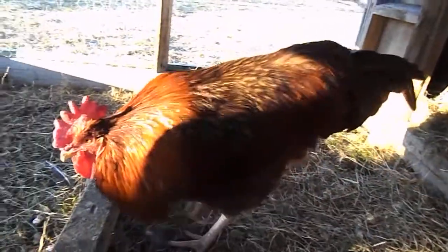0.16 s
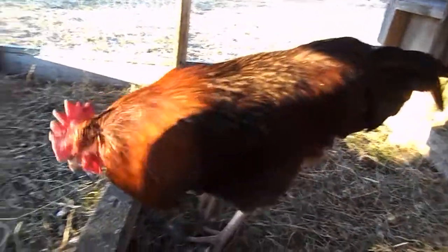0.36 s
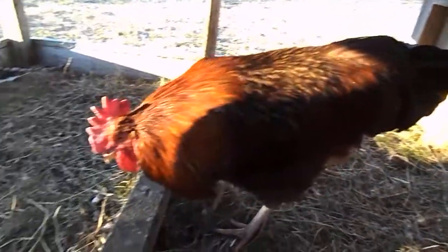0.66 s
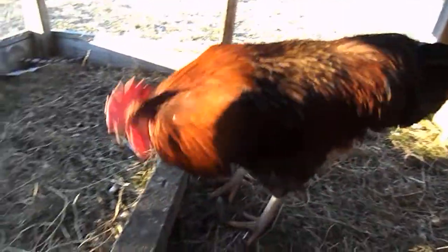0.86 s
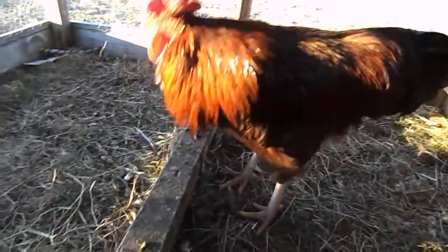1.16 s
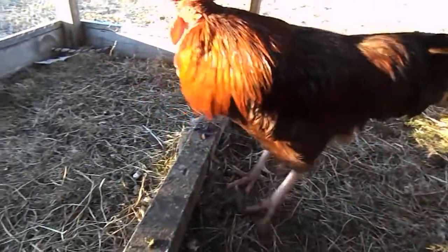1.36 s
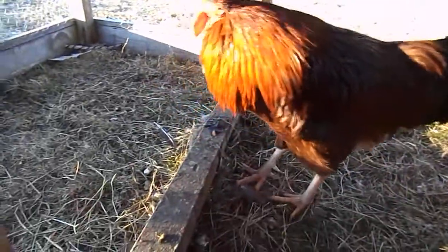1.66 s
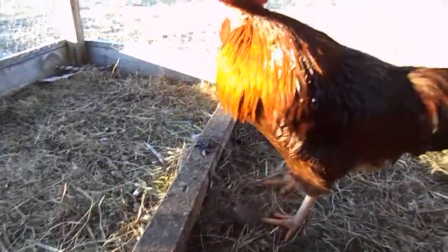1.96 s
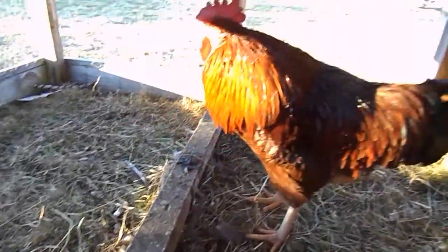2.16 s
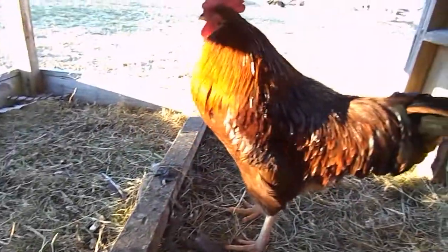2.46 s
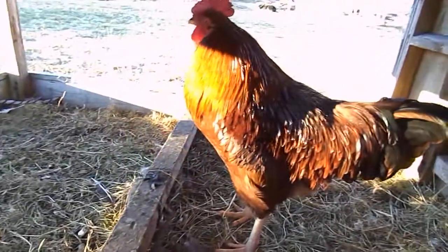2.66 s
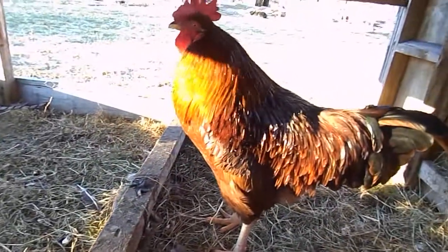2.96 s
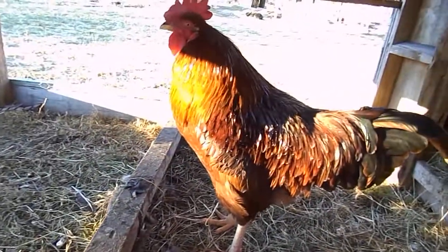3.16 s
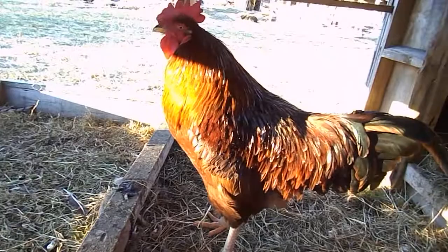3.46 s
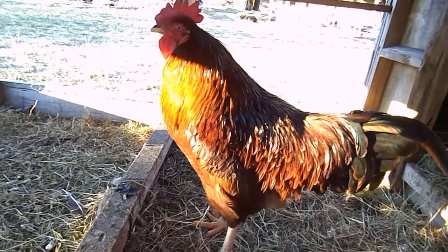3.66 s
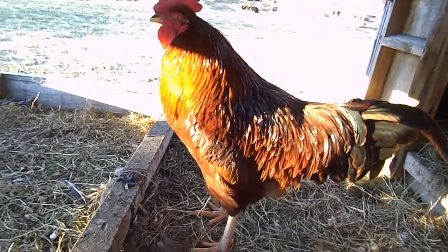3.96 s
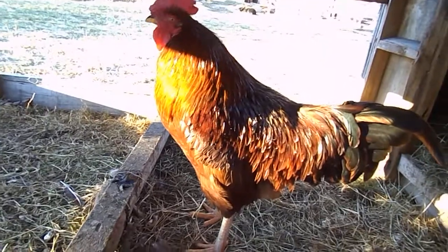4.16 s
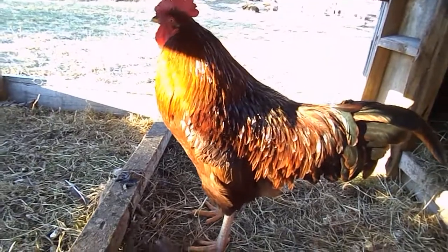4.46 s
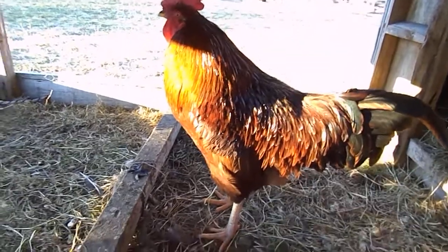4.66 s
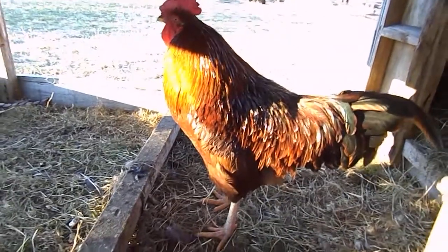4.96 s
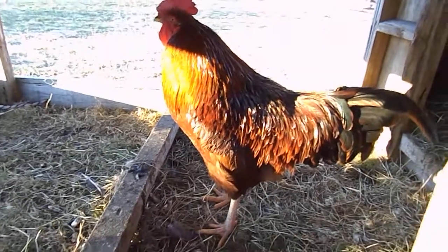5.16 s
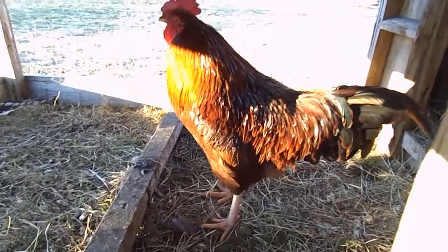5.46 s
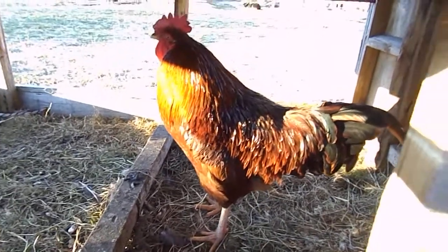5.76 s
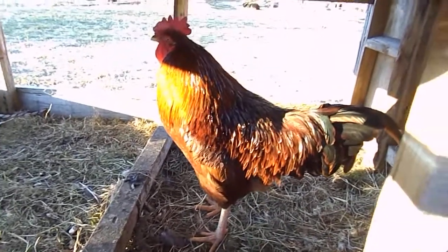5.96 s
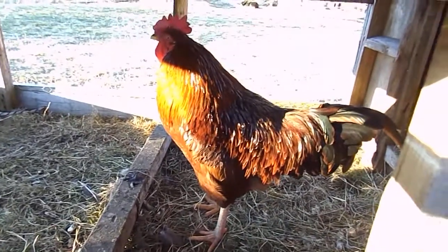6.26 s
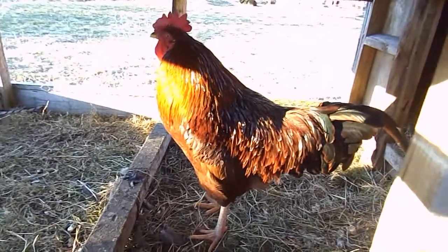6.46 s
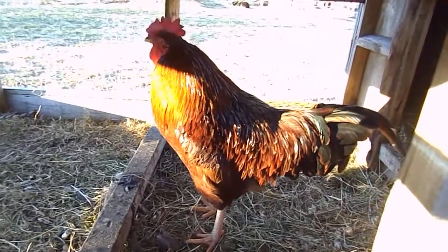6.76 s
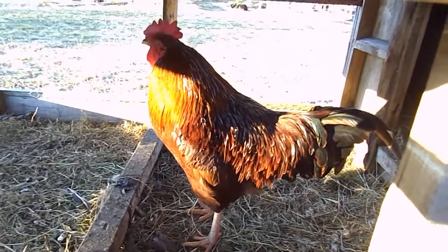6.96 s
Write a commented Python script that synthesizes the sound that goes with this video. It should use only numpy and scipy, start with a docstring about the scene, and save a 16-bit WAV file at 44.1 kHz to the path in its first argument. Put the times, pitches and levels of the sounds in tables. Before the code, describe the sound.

From the start, dry straw rustles in quick uneven swishes close to the microphone, leaning left, with bright crackles and snapping stalks. A faint, husky, unsteady whine from the rooster comes at about 0.55 s. Around 0.85-1.05 s soft treads and thuds cluster in heavier, duller rustling. At 1.27 s a very loud hard plastic clack chatters right on the microphone with a dull push; a second, fainter whine follows at 1.4 s. Another clack lands near 1.67 s, among light hard taps from 1.55 to 2.3 s. The rustle thins after 2.7 s, leaving sparse taps and swishes. Sharp plastic clacks return at 4.1-4.2, 4.5, 5.1 and 5.3 s, with soft rubbing that lingers to about 6.5 s. Faint muffled scuffs dot 5.6-6.7 s. Quiet outdoor murmur, hiss and a barely audible, very high electronic tone continue to the end, about 7 s.

```python
"""Rooster in straw under a handled microphone

A rooster pecks and steps about in straw: filtered slips rustle, short bursts snap, tap and tread, and
he gives two faint husky whines. The rustle then thins out, and hard plastic clacks (bursts ringing a
bank of resonances) and soft rubbing, probably a grip shifting on the microphone's shell, stand out.
Faint muffled scuffs, a quiet outdoor murmur, hiss and a thin electronic tone add to it (noise, a sine)."""
import sys
import numpy as np
from scipy import signal
from scipy.fft import rfft, irfft, next_fast_len
from scipy.io import wavfile
from scipy.ndimage import uniform_filter1d

SR = 44100
rng = np.random.default_rng(int(sys.argv[2]) if len(sys.argv) > 2 else 0)


def digitize_waveform(pressure):
    """Quantize a signal to 16-bit integers and store it at the path in sys.argv[1].

    Rows of a 2-D input are taken as channels; values are limited to [-1, 1].
    """
    field = np.atleast_2d(pressure).T
    bounded = np.clip(field, -1, 1)
    quanta = np.round(bounded * 32767).astype(np.int16)
    wavfile.write(sys.argv[1], SR, quanta)


N = 313630

# The bands of thud, knock, ring and crack in every small hit. Each row: low edge in Hz, high edge in Hz.
BANDS = [(240, 720), (750, 2200), (2750, 7300), (7700, 15000)]


def amp(db):
    """Decibels to gain."""
    return 10 ** (np.asarray(db) / 20)


def unit(x):
    """Scales to an rms of 1."""
    return x / np.sqrt(np.mean(x ** 2) + 1e-20)


def read(points, hz):
    """Reads a spectrum on a log-frequency axis."""
    f, value = np.transpose(points)
    return np.interp(np.log(hz + 1), np.log(f), value)


def add(mix, s, sound):
    """Adds a stereo sound into the mix at time s."""
    part = mix[:, max(round(s * SR), 0):][:, :sound.shape[1]]
    part += sound[:, :part.shape[1]]


def sides(pan_db):
    """Left and right gains of constant total power; positive leans left."""
    pair = amp(np.array([pan_db, -pan_db]).reshape(2, -1) / 2)
    return pair / np.sqrt(np.mean(pair ** 2, axis=0))


def lowpass(x, order, hz):
    """Butterworth treble cut."""
    return signal.sosfilt(signal.butter(order, hz, fs=SR, output="sos"), x)


def highpass(x, order, hz):
    """Butterworth bass cut."""
    return signal.sosfilt(signal.butter(order, hz, "high", fs=SR, output="sos"), x)


def bandpass(x, order, edges):
    """Butterworth band between two edges in Hz."""
    return signal.sosfilt(signal.butter(order, edges, "band", fs=SR, output="sos"), x)


def resonate(x, hz, width):
    """One resonance with a gain of 1 at its peak."""
    return signal.lfilter(*signal.iirpeak(min(hz, .45 * SR), hz / width, fs=SR), x)


def wander(rate_hz):
    """Slow chance with an rms of 1: noise whose spectrum falls away around rate_hz."""
    size = next_fast_len(N, True)
    hz = np.fft.rfftfreq(size, 1 / SR)
    noise = rfft(rng.standard_normal(size))
    return unit(irfft(noise * np.exp(-np.minimum(hz / rate_hz, 10) ** 2), size)[:N])


def diffuse(x, spectrum):
    """Colours two unrelated signals and blends them as two ports would: alike in the bass, not the treble."""
    # How alike the two ports hear diffuse sound. Each row: frequency in Hz, likeness from -1 to 1.
    likeness = [(60, 0.69), (130, 0.91), (290, 0.75), (640, 0.65), (1410, 0.4), (3100, 0), (15000, 0)]
    size = next_fast_len(N, True)
    hz = np.fft.rfftfreq(size, 1 / SR)
    same = np.clip(read(likeness, hz), -1, 1)
    a, b = rfft(x, size) * amp(read(spectrum, hz))
    mid, side = a * np.sqrt(1 + same), b * np.sqrt(1 - same)
    return unit(irfft([mid + side, mid - side], size)[:, :N])


def puff(hz, width, length):
    """Noise through one resonance twice, swelling and fading, with an rms of 1."""
    count = round(length * SR) + 1
    noise = rng.standard_normal((3, count + 2048))  # 2048 samples of run-in
    shared = noise[:2] + noise[2]
    band = resonate(resonate(shared, hz, width), hz, width)[:, -count:]
    return unit(band * np.sin(np.pi * np.arange(count) / count))


def swish_db(offset_db, weight_share, rest_db):
    """Level of one part of the rustle: swishes rise, hold with a slight creep upward and die away."""
    # Swishes of straw and feathers and strokes of the grip; heavy ones sound duller.
    # Each row: start in seconds, length before release in seconds, level in dB before the part's offset,
    # weight in dB, of which each part takes its share.
    swish_rows = [(0, 0.0074, -43.5, 1), (0.043, 0.18, -53, -5), (0.174, 0.098, -42, -8.5),
                  (0.282, 0.343, -45.5, -1), (0.57, 0.15, -46, 2), (0.673, 0.2, -46, 3),
                  (0.837, 0.13, -41, 7.5), (0.997, 0.081, -47, 11), (1.11, 0.19, -50, 12),
                  (1.349, 0.2148, -51.5, 12), (1.502, 0.11, -42.5, 2.5), (1.641, 0.15436, -47, 2),
                  (1.777, 0.07862, -45, 0.5), (1.887, 0.1266, -45.5, -5.5), (2.016, 0.096, -45.5, -0.5),
                  (2.102, 0.032, -51.5, 10), (2.17, 0.179, -54, 5), (2.429, 0.077, -52.5, 6.5),
                  (2.565, 0.053, -53.5, 9), (3.195, 0.23, -58, -4), (3.608, 0.35, -59, 6.5),
                  (4.178, 0.06156, -49.5, 0), (4.289, 0.195, -60, -6), (4.458, 0.15, -52.5, 6.5),
                  (4.596, 0.084, -49.5, 6.5), (4.899, 0.215, -53, 6), (5.122, 0.50193, -50.5, 1),
                  (5.628, 0.4, -56, -5), (6.438, 0.056, -72.5, 15), (6.561, 0.16, -65.5, 14.5)]
    attack_s, attack_share = 0.023, 0.067  # a long swish also starts more slowly
    creep_db, release_db_per_s = 0.16, 147.5
    t = np.arange(0, N, 64) / SR
    power = np.full(len(t), amp(rest_db) ** 2)  # a faint steady stir beneath
    for start, length, db, weight_db in swish_rows:
        age = np.maximum(t - start, 0)
        rise = np.minimum(age / (attack_s + attack_share * length), 1)
        creep = creep_db * (np.minimum(age / length, 1) - .5)
        release = release_db_per_s * np.maximum(age - length, 0)
        power += (rise * amp(db + offset_db + weight_share * weight_db + creep - release)) ** 2
    return np.interp(np.arange(N) / SR, t, 10 * np.log10(power))


def slips(per_s, spread_db, smooth):
    """Countless tiny slips of uneven size, over a smooth sliding noise."""
    clicks = np.zeros((2, N))
    hit = rng.random((2, N)) < per_s / SR
    draw = rng.laplace(size=(2, N))[hit]
    clicks[hit] = np.sign(draw) * amp(spread_db * np.minimum(abs(draw), 3.3))
    return unit(clicks) + smooth * rng.standard_normal((2, N))


def flutter(x, patchy_db):
    """Brief random patches of the spectrum rise and fall."""
    z = signal.stft(x, nperseg=256)[2]
    across_pitch = uniform_filter1d(rng.standard_normal(z.shape[1:]), size=12, axis=0)
    patches = unit(uniform_filter1d(across_pitch, size=3, axis=1))
    return unit(signal.istft(z * amp(patchy_db * patches), nperseg=256)[1][:, :N])


def rustle():
    """Sliding contact in three parts that share one unsteady pressure, with stray crackles."""
    # Colours of the dull brush, the mid scrape, the high fizz and the breaking stalks.
    # Each row: frequency in Hz, relative density in dB per Hz.
    brush_colour = [(40, -42.5), (110, -44), (200, -11), (330, 0), (600, 0.5), (850, -3.5), (1200, 0.5),
                    (1600, -4.5), (2100, -6.5), (3000, -12), (6000, -49.5)]
    scrape_colour = [(600, -50), (1500, -8), (2200, -4.5), (3200, -1.5), (3700, -1), (4400, -2), (5600, -3),
                     (7000, -6.5), (8500, -17.5), (13000, -39)]
    fizz_colour = [(3000, -34), (6000, -12), (7500, -4), (10000, 0.5), (12500, 1), (14500, 1), (16000, -6)]
    crackle_colour = [(500, -30), (1800, -8), (4500, -3), (10000, -3.5), (16000, -1.5)]
    brush_db = swish_db(offset_db=-10.5, weight_share=0.99, rest_db=-66)
    scrape_db = swish_db(offset_db=-6.5, weight_share=0.4992, rest_db=-66)
    fizz_db = swish_db(offset_db=1.128, weight_share=.02, rest_db=-60.5)

    pressure = wander(rate_hz=33.0)
    grains = slips(per_s=1900, spread_db=4.5, smooth=0.81)
    coarse = slips(per_s=900, spread_db=3.5, smooth=1.5237)
    brush = diffuse(coarse, brush_colour) * amp(brush_db + 1.4656 * pressure)
    scrape = flutter(diffuse(grains, scrape_colour), patchy_db=2.0) * amp(scrape_db + 1.0 * pressure)
    fizz = flutter(diffuse(grains, fizz_colour), patchy_db=0.8) * amp(fizz_db + 0.5764 * pressure)
    # the smallest stalks break at random, following the fizz
    breaks = slips(per_s=22, spread_db=0.5, smooth=0)
    crackle = diffuse(breaks, crackle_colour) * amp(fizz_db - 19)

    near_db, near_pan_db, pan_per_db = -44.5, 6, 0.23  # loud rustling is close to the left port
    pan_db = near_pan_db + pan_per_db * (fizz_db - near_db)
    return (brush + scrape + fizz) * sides(pan_db) + crackle * sides(15.5)


def burst(t60, snap, rise, tail_db, tail_t60):
    """A snap, a dense ring that dies within its t60, and returns from nearby boards."""
    t = np.arange(4096) / SR
    t60 = max(t60, .001)
    noise = rng.standard_normal((3, len(t)))
    swell = 1 - np.exp(-t / (rise * t60))  # long slips start softly
    ring = (noise[:2] + 0.32 * noise[2]) * amp(-60 * t / t60) * swell
    ring /= np.linalg.norm(ring, axis=1, keepdims=True)
    ring[:, 0] -= snap * np.exp(-t60 / 0.0082)  # short ones snap hardest
    tail = rng.standard_normal(ring.shape) * amp(-60 * t / tail_t60)
    return ring + amp(tail_db) * tail / np.linalg.norm(tail[0])


def voiced(x, levels_db, pan_db):
    """Gives each band of a hit its strength, as an rms over 10 ms."""
    out = np.zeros_like(x)
    for edges, db in zip(BANDS, levels_db):
        band = bandpass(x, 4, edges)
        out += amp(db) * band / np.linalg.norm(band, axis=1, keepdims=True)
    return out * np.sqrt(SR / 100) * sides(pan_db)


def tick(t60, hz, levels_db, pan_db):
    """A small dry hit with one broad resonance."""
    blow = burst(t60, snap=4.3, rise=0.0178, tail_db=-18.5, tail_t60=0.050115)
    return voiced(blow + amp(-2.0) * resonate(blow, hz, 0.34 * hz), levels_db, pan_db)


def snaps():
    """Dry stalks break: mostly treble, thinning out band by band toward the bass."""
    # Each row: start in seconds, level of the crack band in dB, thinness in dB lost per band downward.
    snap_rows = [(0.0497, -45, 17), (0.216, -46.5, 5), (0.2922, -42, 8), (.333, -48, 8), (.392, -36.5, 7.5),
                 (0.413, -39, 5), (0.431, -47.5, 4), (.478, -45, 16), (0.586, -43, 6), (0.6389, -39, 10.5),
                 (0.776, -48.5, 15), (.805, -53.5, 15.5), (.909, -46, 10.5), (.921, -44, 3.5),
                 (0.9844, -50.5, 3), (1.059, -45, 4), (1.118, -44, 6), (1.195, -48.5, 3), (1.694, -47, 3),
                 (2.181, -48, 5), (2.311, -51, 7), (2.475, -49, 9), (2.487, -49, 8), (2.6239, -44, 4.5),
                 (2.7034, -51, 2.5), (2.7507, -53, 11.5), (3.7388, -49.5, 7), (4.7003, -47, 4),
                 (4.989, -50, 6), (5.042, -54, 3), (5.24, -42, 6), (5.678, -51, 9), (6.5598, -52, 7)]
    out, bands_down = np.zeros((2, N)), np.arange(len(BANDS))[::-1]
    for s, db, thin_db in snap_rows:
        levels_db = db - thin_db * bands_down
        add(out, s, tick(t60=0.0066, hz=10100, levels_db=levels_db, pan_db=34.5))
    return out


def knocks(rows, t60):
    """Small hits: pitch sets the thud and tilts the crack, hardness of the contact sets the treble."""
    out = np.zeros((2, N))
    for s, db, hz, edge_db, pan_db in rows:
        octaves = np.log2(hz / 1005.3)
        thud_db = -7 - 11.5 * octaves  # low knocks carry more thud
        crack_db = edge_db - 4 + 1 * octaves
        levels_db = db + np.array([thud_db, 0, edge_db, crack_db])
        add(out, s, tick(t60, hz, levels_db, pan_db))
    return out


def treads():
    """Soft treads and thuds: knocks with a slower decay."""
    # Each row: start in seconds, level of the knock band in dB, pitch in Hz,
    # edge in dB against the knock, left-right balance in dB.
    tread_rows = [(.4805, -57, 418, -11.5, -0.5), (.8526, -43.5, 499.4, 0.5, -2),
                  (.8607, -39, 1116, -13, 2), (.8776, -42.5, 750, -13.5, 1), (.886, -46, 600, -1, 0),
                  (.9195, -53, 446, -2.5, -6), (.9396, -56, 599.4, 6, 13.5), (.951, -48, 1100, 3, 6),
                  (.964, -58, 900, -2, 7.5), (.9973, -43.5, 1099, -0.5, 6), (1.063, -46, 901, -1, 4)]
    return knocks(tread_rows, t60=0.018)


def taps():
    """Light hard taps: knocks with a very short decay."""
    # Each row: start in seconds, level of the knock band in dB, pitch in Hz,
    # edge in dB against the knock, left-right balance in dB.
    tap_rows = [(.8565, -37.5, 2205, -1.5, 8), (1.5525, -45.5, 2900, 2, 16.5),
                (1.6112, -51.5, 981, 0.5, 20), (1.6451, -36.5, 950, 2, 26), (1.7466, -42, 2030, -5, 19.5),
                (1.806, -56.5, 2800, 2, 15), (1.836, -46.5, 2200, -1.5, 22), (1.857, -52.5, 2800, -0.5, 15),
                (1.9315, -48, 1390, -0.5, 1.5), (2.0419, -43.5, 583, 4.5, 31), (2.0711, -44.5, 610, 0, 20),
                (2.146, -55.5, 1800, 1, 17.5), (2.168, -56, 1500, -8.5, 18), (2.2892, -42, 1191, -1, 29),
                (3.2412, -45, 850, -7.5, 29.5), (3.6654, -48.5, 1700, -2.5, 29),
                (4.2299, -41.5, 953, -19, 23.5)]
    return knocks(tap_rows, t60=0.0053)


def fowl():
    """Soft whines: one unsteady tone arches and glides, with a weak upper tone and a husky edge."""
    # Each row: start in seconds, length in seconds, tone level in dB, pitch in Hz,
    # jitter and glide as shares of the pitch, husk in dB against the tone.
    call_rows = [(.555, .22, -53.5, 1298, .025, 0.0358, -2), (1.389, .23, -57, 1540, 0.0642, -.1, 2.5)]
    out = np.zeros((2, N))
    for s, length, db, hz, jitter, glide, husk_db in call_rows:
        husk = amp(husk_db) * puff(hz, 0.27 * hz, length)
        count = husk.shape[1]
        age = np.linspace(-.5, .5, count)
        arch = 0.0283 * (2 * age) ** 2
        pitch = hz * (1 + glide * age - arch + jitter * wander(rate_hz=110)[:count])
        phase = 2 * np.pi * np.cumsum(pitch) / SR
        tone = np.sin(phase) + amp(-14) * np.sin(1.94 * phase)
        whine = unit(np.cos(np.pi * age) * tone)
        add(out, s, amp(db) * (whine + husk))
    return out


def shell(x, direct_db, scatter, damping):
    """The shell's resonances at the two ports: centres scatter at random per call, damping scales widths."""
    # Resonances of the plastic shell. Each row: centre in Hz before scatter, width in Hz before damping,
    # level at the left port in dB, level at the right port in dB.
    modes = [(490, 510, -8.0, -9), (1146, 220, -0.5, -2.5), (1742, 250, -4, -7), (2180, 261, -6, -12.5),
             (2630, 370, -6.5, -10.5), (3270, 340, -6, -3), (3610, 300, -2.5, -6), (3980, 700, -2.5, -8),
             (4734, 550, -10, 1), (5290, 400, -3, -2.5), (5900, 450.0, -1, -7.5), (6870, 940, -6.5, -1.5),
             (9010, 2500, -12.5, -8.5), (11120, 770, -11, -6.5), (12255, 850, -12.5, -11.5),
             (14400, 1492, -13.5, -5.5)]
    out = amp(direct_db) * x
    for k, (hz, width, left_db, right_db) in enumerate(modes):
        scattered_hz = hz * (1 + scatter * rng.standard_normal())
        gains = (-1) ** k * amp([[left_db], [right_db]])  # neighbours have opposite sign
        out = out + gains * resonate(x, scattered_hz, damping * width)
    return out


def coloured(x, spectrum):
    """Gives a short sound a broad colour by a minimum-phase filter, without blurring its attack."""
    count = x.shape[1]
    log_gain = np.log(amp(read(spectrum, abs(np.fft.fftfreq(count, 1 / SR)))))
    response = np.exp(np.conj(signal.hilbert(log_gain)))
    return np.fft.ifft(np.fft.fft(x) * response).real


def clacks():
    """Plastic parts catch with a snap and short chatter, ringing the shell; two rings are tuned per clack."""
    # Hard clacks right at the microphone. Each row: start in seconds, level in dB as an rms over 10 ms,
    # thud, body, brightness and edge in dB against the main knock, left-right balance in dB,
    # first ring in Hz, its prominence in dB, second ring in Hz, its prominence in dB,
    # top cutoff in Hz, t60 of the slip in seconds.
    clack_rows = [(1.2648, -24, 14, 4, -8.5, 5.5, 3, 4680, 4, 2740, 7, 11500, 0.024),
                  (1.2702, -22.5, 6, 4, -8, -2, 1, 1120, 6, 2180, 9, 12500, .04),
                  (1.2762, -13, -1, -4, -4.5, 3, 1.5, 4386, 17, 3600, -4.5, 9000, .0095),
                  (1.2785, -27.5, 0, 5, -5, -2.5, 7.5, 1620, 8.5, 2300, 10, 9000, 0.021),
                  (1.2826, -19.5, 14, -3, -17, 14, 4, 12600, 7, 9050, 11, 13500, .009),
                  (1.2904, -32.5, 14.5, 2, -3.5, -4, 9.5, 900, 1, 6500, 0.5, 9000, .012),
                  (1.665, -35, 5, -3, -2.5, 6, 6, 13450, -.5, 4000, 3, 14500, 0.022),
                  (1.675, -23.5, -6, 5.5, 1, 13, -1.5, 11130, 6, 1860, 5, 14500, 0.014),
                  (4.1218, -27, -4, -2.5, -4.5, -7.5, 2.5, 3760, 2.5, 1590, 2, 15300, 0.011),
                  (4.1513, -26, 3, -4, 2.5, -4.5, 2, 3800, 7.5, 1630, 4, 15000, 0.0091),
                  (4.1572, -37.5, 6, 1, -7, -0.5, 0, 6900, -3, 4950, -4.5, 12000, 0.082),
                  (4.205, -23, 8.5, 3.5, 7.5, 0.5, -0.5, 3130, 10, 3770, 5, 15000, 0.0076),
                  (4.5306, -20.5, -8, 2, 0, 0.5, -3, 3090, 11.5, 2760, -4, 15000, 0.019),
                  (4.5414, -28, 0, 2.5, -1, 8, 2, 3120, 16, 4930, -4, 15000, 0.019),
                  (5.072, -29, 9, -5, 0, 9, 6.5, 4660, -5, 384, -2, 14000, 0.0059),
                  (5.3327, -22.5, -9, -15.5, 4, 5.5, 3, 3920, -4, 8350, -10, 14700, 0.0017)]
    # Where thud, body, main knock, brightness and edge lie, in Hz.
    colour_hz = [300, 1200, 3500, 6000, 11000]
    out = np.zeros((2, N))
    for (s, db, thud_db, body_db, bright_db, edge_db, pan_db,
         first_hz, first_db, second_hz, second_db, top_hz, t60) in clack_rows:
        blow = burst(t60, snap=4.6, rise=0.0072, tail_db=-6.0, tail_t60=0.039)
        body = shell(blow, direct_db=-43.0, scatter=0.0036, damping=.6)
        first = amp(first_db) * resonate(body, first_hz, 0.073 * first_hz)
        second = amp(second_db) * resonate(body, second_hz, 0.073 * second_hz)
        body = lowpass(body + first + second, 4, min(top_hz, SR / 2 - 1))
        bass = (80, thud_db - 23)  # below its thud a clack falls away
        contact = [bass, *zip(colour_hz, [thud_db, body_db, 0, bright_db, edge_db])]
        left, right = coloured(body, contact)
        clack = np.array([left, np.roll(right, 1)])  # the right port hears it one sample later
        clack *= np.sqrt(SR / 100) / np.linalg.norm(clack, axis=1, keepdims=True)
        add(out, s, amp(db) * clack * sides(pan_db))
    return out


def drags():
    """Skin sticks and slips on the plastic, and the shell colours it."""
    # Each row: start in seconds, rise in seconds, hold in seconds, fall in seconds, level in dB.
    drag_rows = [(0.83, 0.04, 0.198, 0.283, -47.5), (1.249, 0.013, 0.0044, 0.025, -27),
                 (3.55, 0.123, 0.27, 0.2534, -61.5), (4.2, 0.0051, 0.011, 0.04124, -35.5),
                 (4.477, 0.043, 0.019, 0.05, -44.5), (4.551, 0.052, 0.113, 0.25, -58),
                 (4.801, 0.23, 0.59, 0.883, -53.5)]
    depth_db = 21.5  # how far a drag rises and falls
    t, level = np.arange(N) / SR, np.zeros(N)
    for start, rise, hold, fall, db in drag_rows:
        grip = np.interp(t, start + np.cumsum([0, rise, hold, fall]), [0, 1, 1, 0])
        level += amp(db - depth_db * (1 - grip)) * (grip > 0)
    friction = slips(per_s=1800, spread_db=3.0, smooth=0.86)
    grains = shell(friction, direct_db=-14.5, scatter=0.0054, damping=0.62)
    softened = bandpass(grains, 2, [600, 5000])
    return unit(softened) * level * sides(1.5388)


def rasps():
    """Short and long rasps of rubbing and rustling, each a puff of narrow noise."""
    # Each row: start in seconds, level in dB, pitch in Hz, width of each filter pass in Hz, length in seconds.
    rasp_rows = [(0.21, -53, 7700, 1800, 0.077), (0.862, -52, 6880, 900, 0.13),
                 (0.971, -47, 6900, 600, 0.023), (1.017, -51, 6950, 900, 0.07),
                 (1.113, -46.5, 4881, 1000, 0.011815), (1.163, -55.5, 5277, 700, 0.01421),
                 (1.242, -43.5, 7858, 450, 0.03903), (3.806, -64, 5348, 900, 0.204),
                 (4.949, -66.5, 3272, 800, 1.28), (4.951, -65.5, 4400, 1000, 1.22)]
    out = np.zeros((2, N))
    for s, db, hz, width, length in rasp_rows:
        add(out, s, amp(db) * puff(hz, width, length) * sides(2.464))
    return out


def bumps():
    """Dull low pushes, probably of the hand: short noise puffs with the deep bass cut."""
    # Each row: start in seconds, level in dB, pitch in Hz, length in seconds before the filter's tail.
    bump_rows = [(.85, -56, 206, 0.058), (1.28, -33, 293, .016), (1.286, -41.5, 350.1, 0.02463),
                 (5.415, -60, 150.6, 0.026), (5.449, -63, 124.3, 0.053), (5.626, -66.5, 136, 0.028)]
    out = np.zeros((2, N))
    for s, db, hz, length in bump_rows:
        push = puff(hz, 0.49 * hz, length)
        fading = push * np.exp(-1.5 * np.linspace(0, 1, push.shape[1]))
        padded = np.pad(fading, ((0, 0), (0, 1024)))  # room for the filter to ring out
        add(out, s, amp(db) * unit(highpass(padded, 4, 0.54 * hz)))
    return out


def scuffs():
    """Faint muffled knocks and scuffs: puffs of broad low noise with no treble."""
    # Each row: start in seconds, level in dB before the treble cut, pitch in Hz, length in seconds.
    scuff_rows = [(0.474, -50.5, 520, .02), (0.905, -50, 498.1, 0.021), (1.052, -55, 751, 0.0277),
                  (1.171, -50, 548.8, 0.0212), (5.57, -56, 847.7, 0.027), (5.811, -61.5, 849.8, 0.11),
                  (6.151, -60.5, 747.4, 0.05865), (6.437, -58.5, 741, 0.068), (6.554, -52.5, 650.4, .016),
                  (6.646, -45, 910, 0.0097)]
    out = np.zeros((2, N))
    for s, db, hz, length in scuff_rows:
        add(out, s, amp(db) * puff(hz, 1.16 * hz, length))
    return lowpass(out, 8, 1490)


def air():
    """The outdoor murmur with the microphone's hiss as unsteady coloured noise, and a thin whine as a sine."""
    # Colour of murmur and hiss. Each row: frequency in Hz, relative density in dB per Hz.
    air_colour = [(18, -91), (30, -50), (287, -1), (473, -7.5), (512, -7), (616, -7), (1190, -9),
                  (1350, -13), (1720, -14), (2680, -19), (2900, -17.5), (8080, -21.5), (10800, -24),
                  (12000, -27), (16000, -33.5)]
    # A thin steady electronic tone. Each row: frequency in Hz, rms level in dB.
    tone_rows = [(11719, -75.5)]
    level_db = -55 + 1.0 * wander(rate_hz=7.683)
    murmur = diffuse(rng.standard_normal((2, N)), air_colour) * amp(level_db)
    t = np.arange(N) / SR
    whine = sum(amp(db) * np.sqrt(2) * np.sin(2 * np.pi * hz * t) for hz, db in tone_rows)
    return murmur * sides(-0.4988) + whine


def scene():
    """Everything at the two ports."""
    bird = rustle() + snaps() + treads() + taps() + fowl()
    handling = clacks() + drags() + rasps() + bumps()
    return bird + handling + scuffs() + air()


def record(dry):
    """Peaks clip at full scale; then come the recorder's low cut at 85 Hz and band limit at 16.1 kHz."""
    thinned = highpass(np.clip(dry, -1, 1), 2, 85)
    band_limit = signal.firwin(511, 16100, window=("kaiser", 9), fs=SR)
    return signal.oaconvolve(thinned, band_limit[None], "same")


dry = scene()
out = record(dry)
digitize_waveform(out)
```